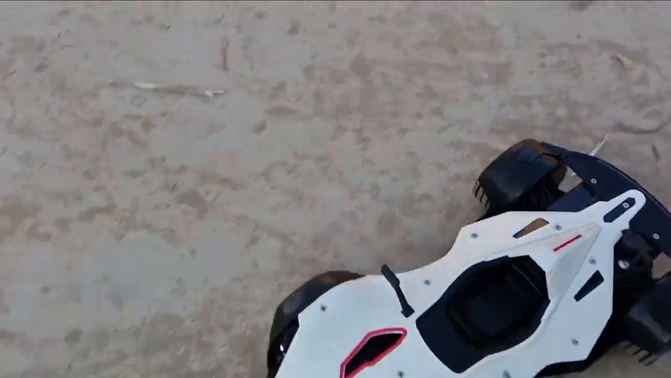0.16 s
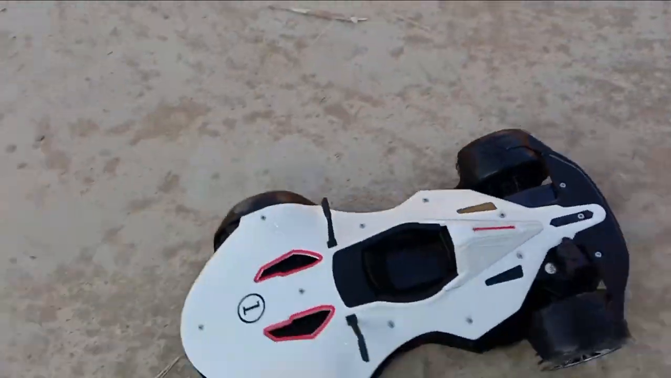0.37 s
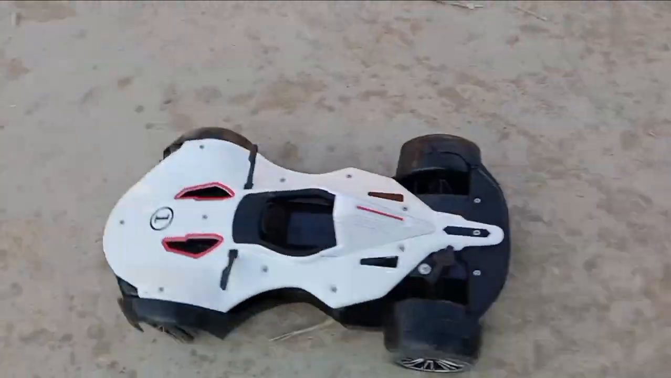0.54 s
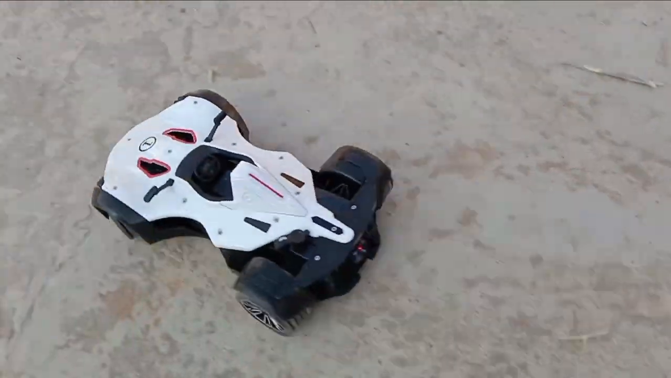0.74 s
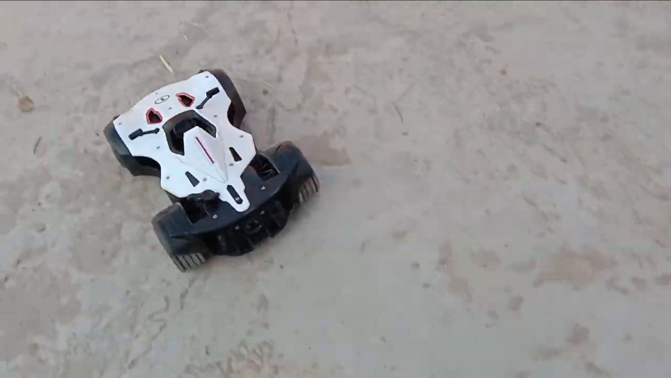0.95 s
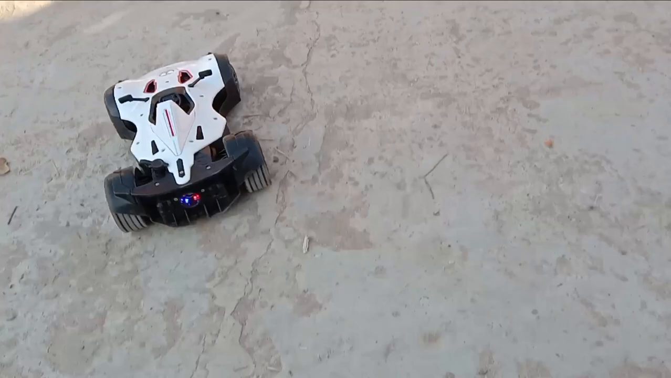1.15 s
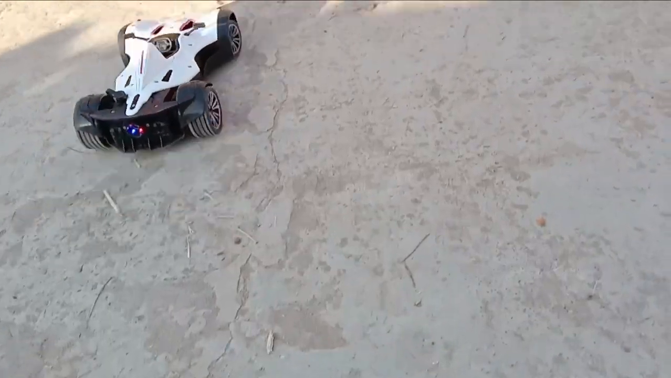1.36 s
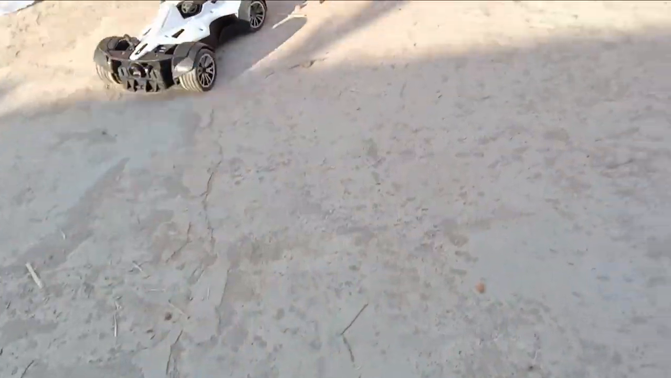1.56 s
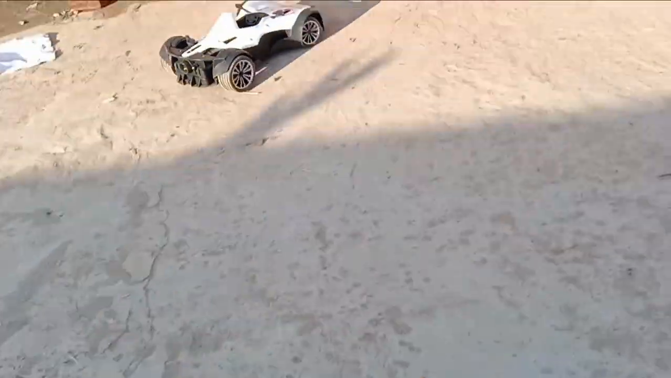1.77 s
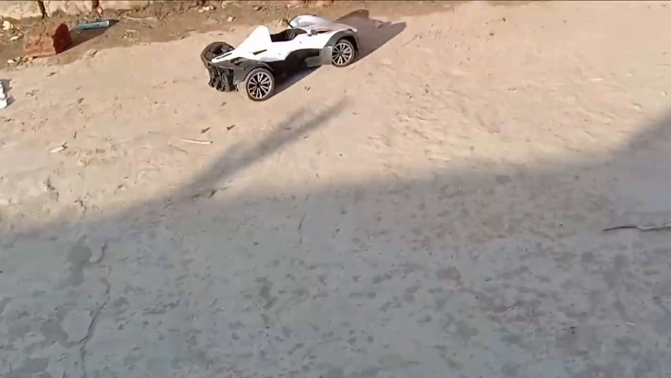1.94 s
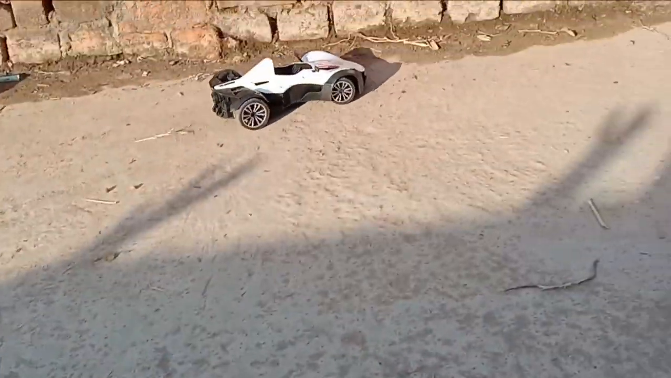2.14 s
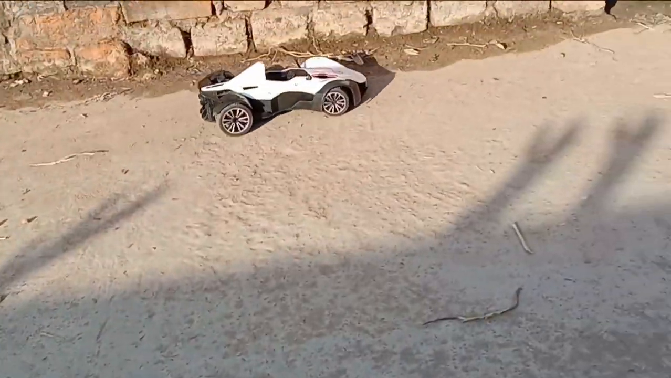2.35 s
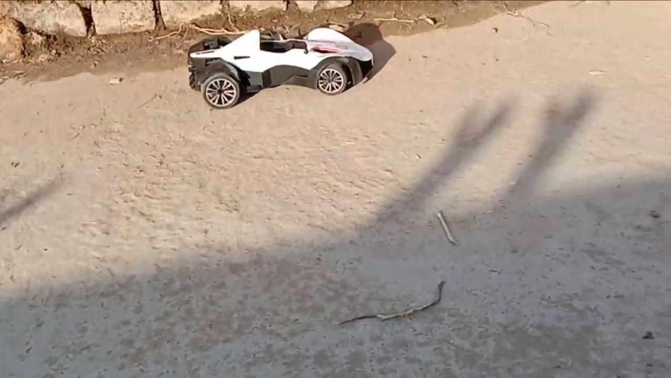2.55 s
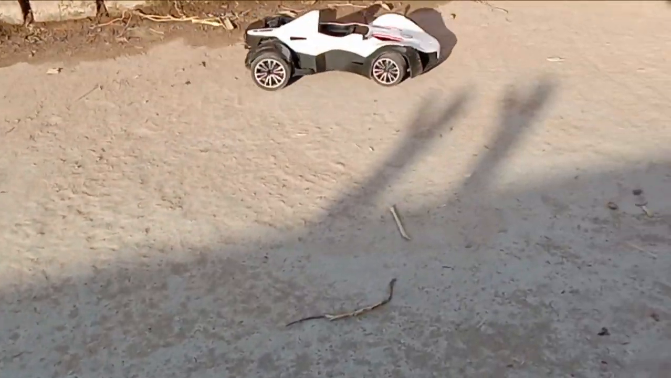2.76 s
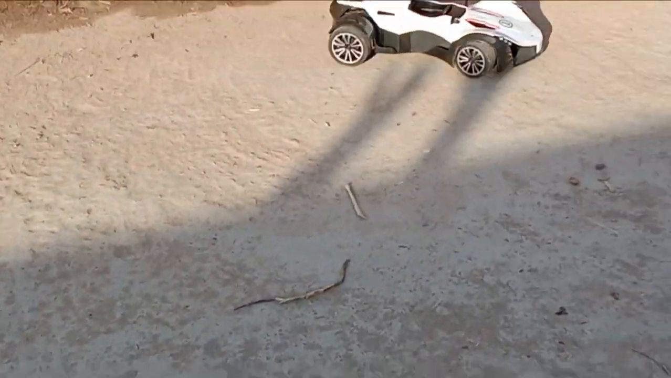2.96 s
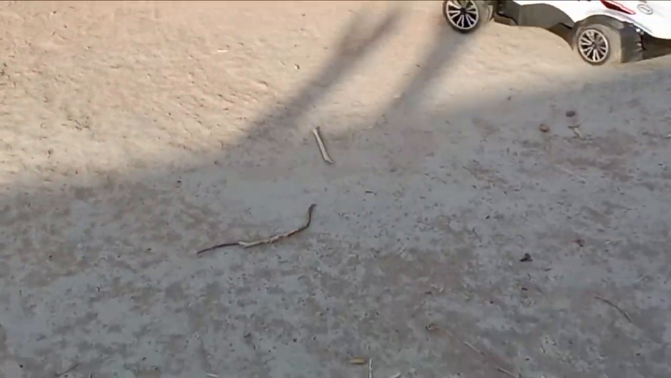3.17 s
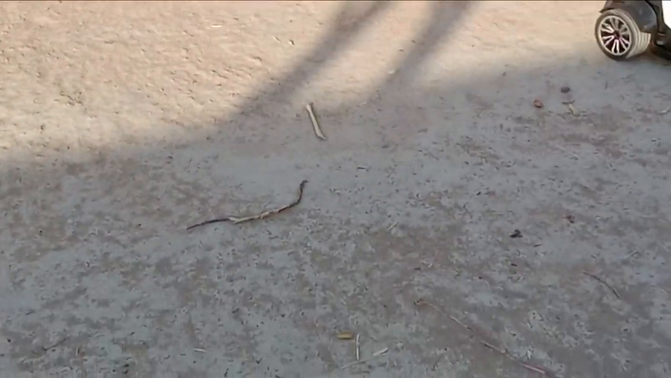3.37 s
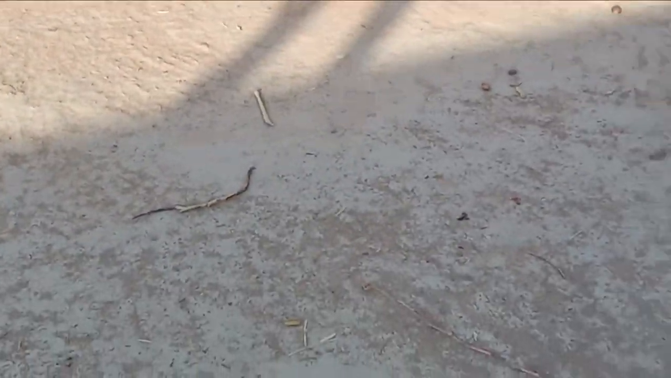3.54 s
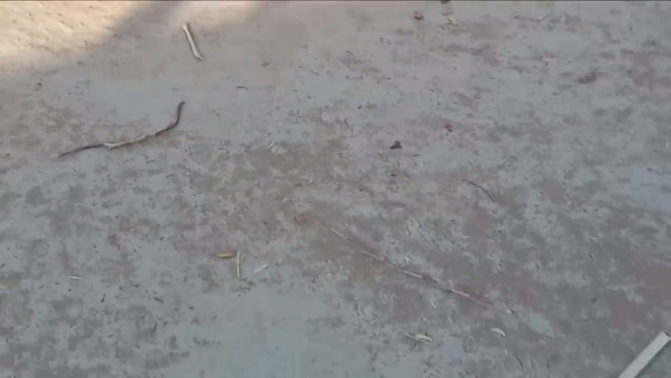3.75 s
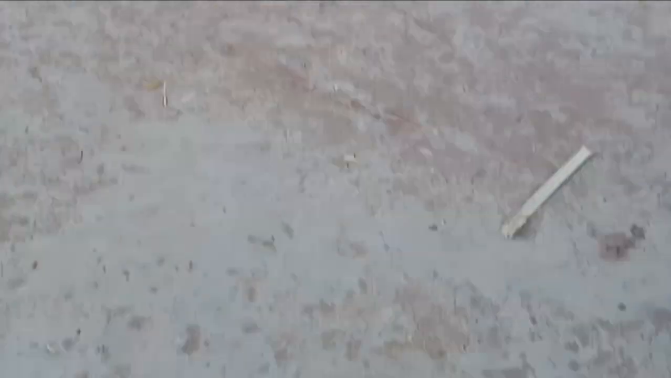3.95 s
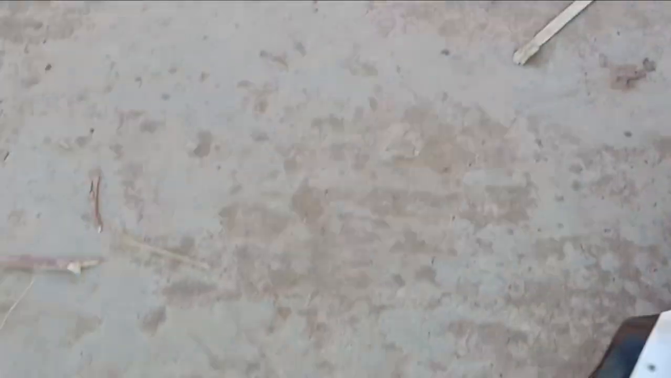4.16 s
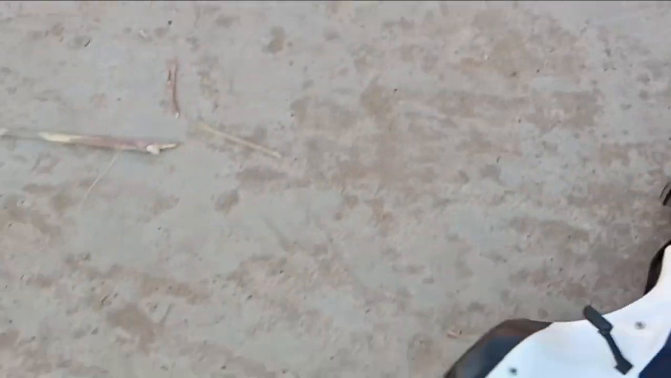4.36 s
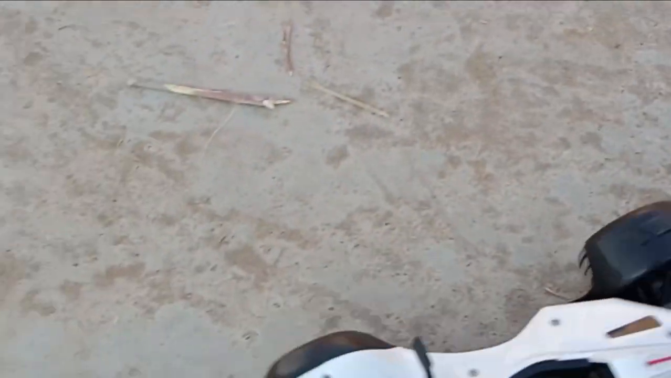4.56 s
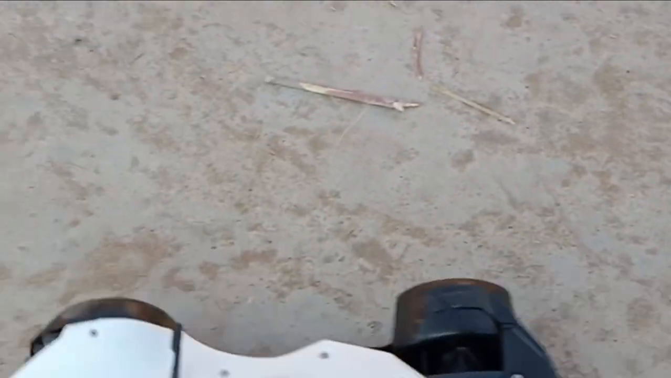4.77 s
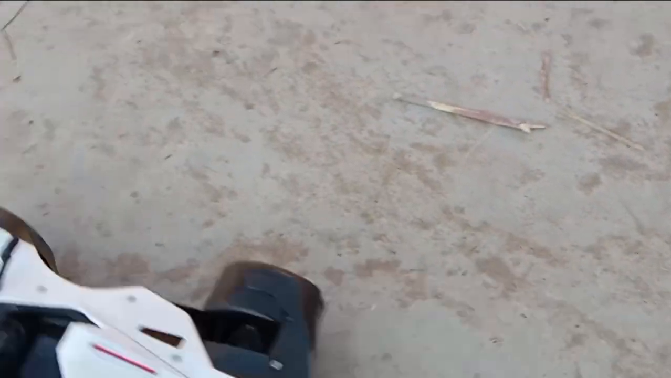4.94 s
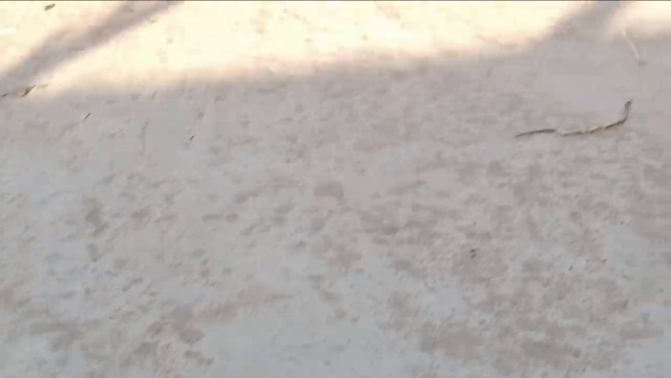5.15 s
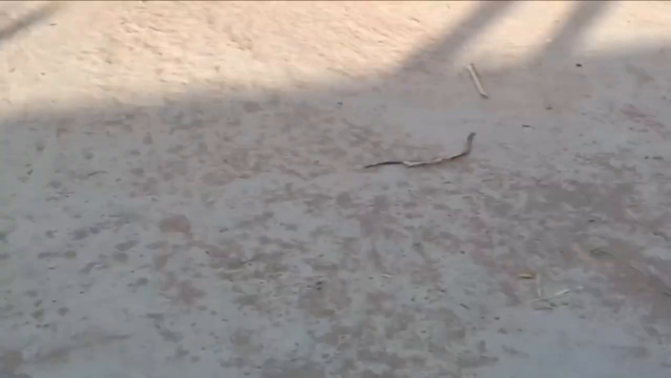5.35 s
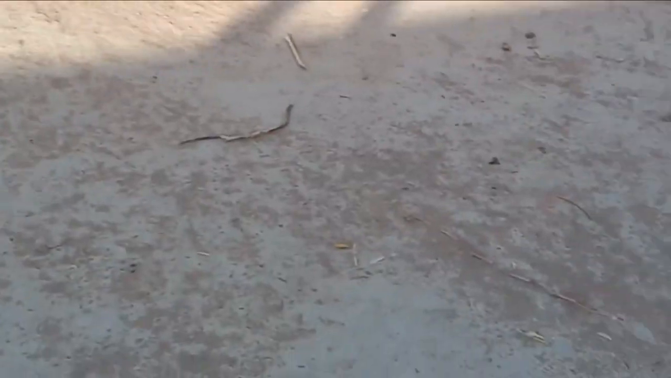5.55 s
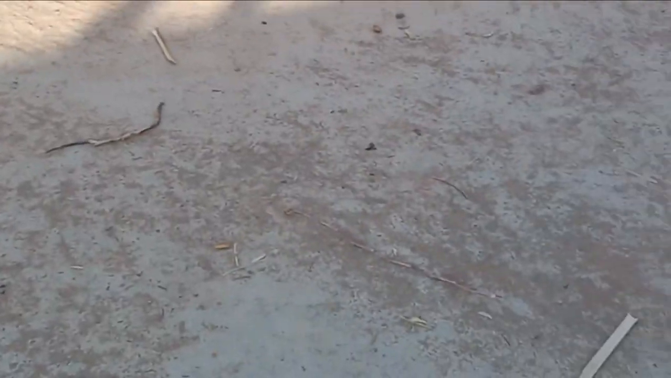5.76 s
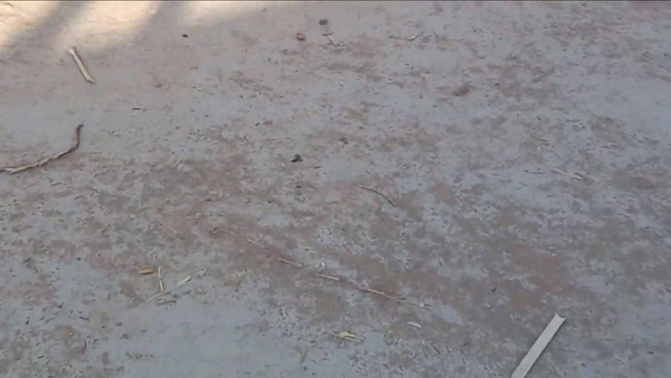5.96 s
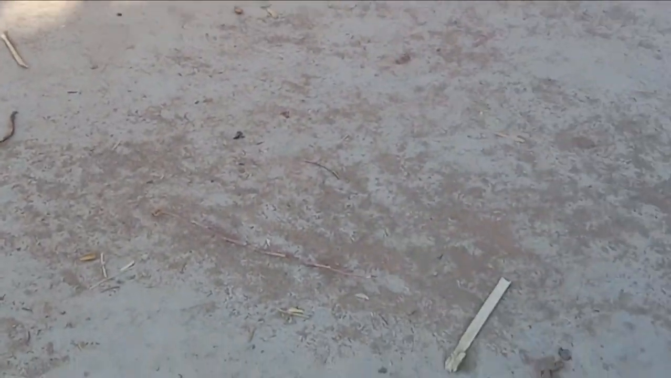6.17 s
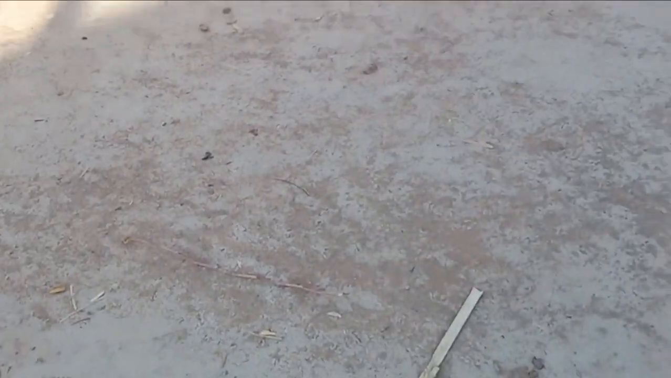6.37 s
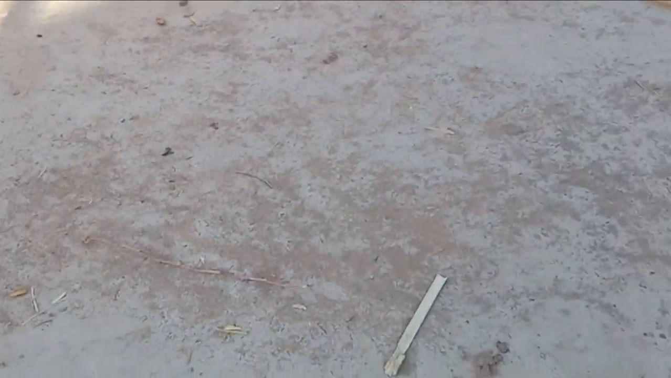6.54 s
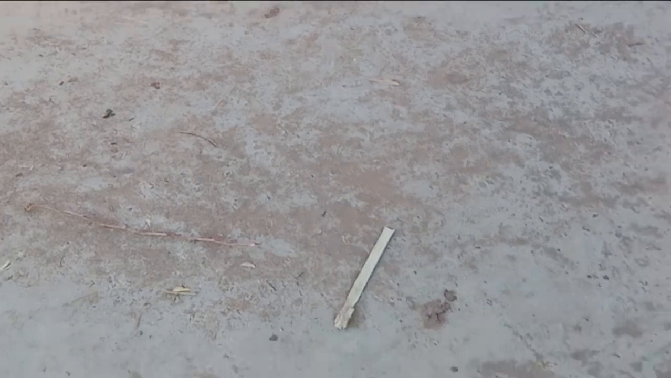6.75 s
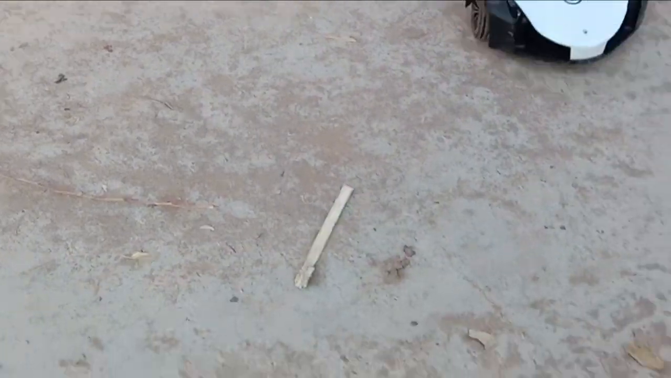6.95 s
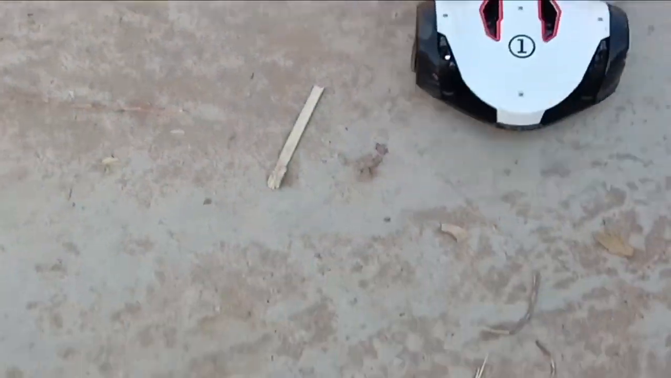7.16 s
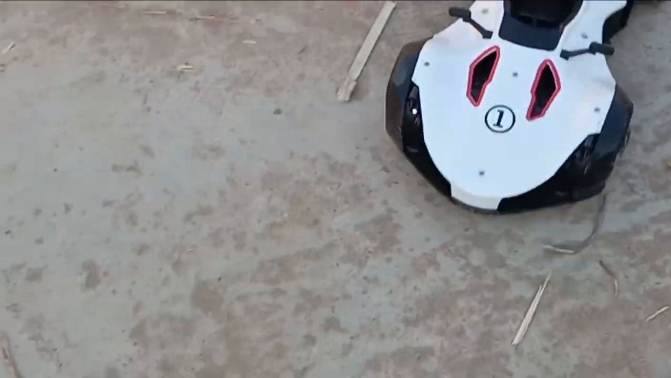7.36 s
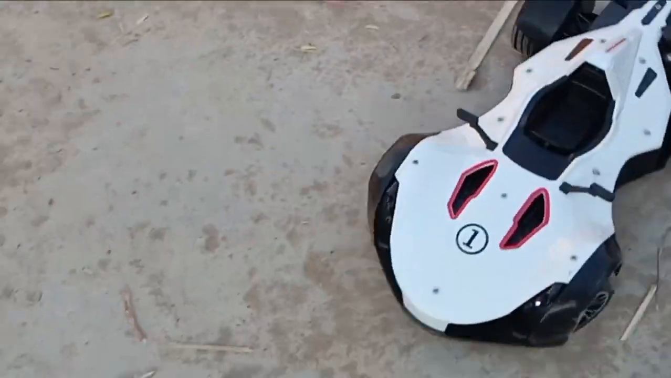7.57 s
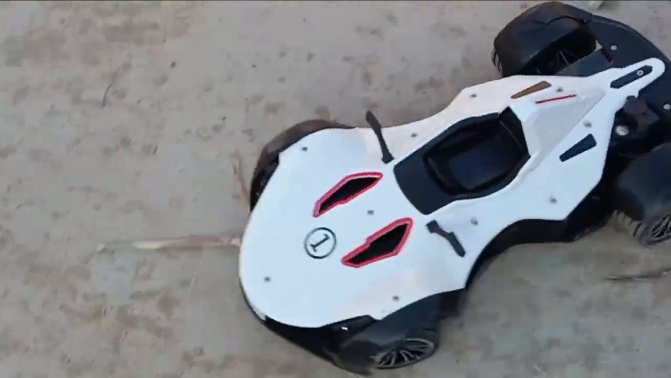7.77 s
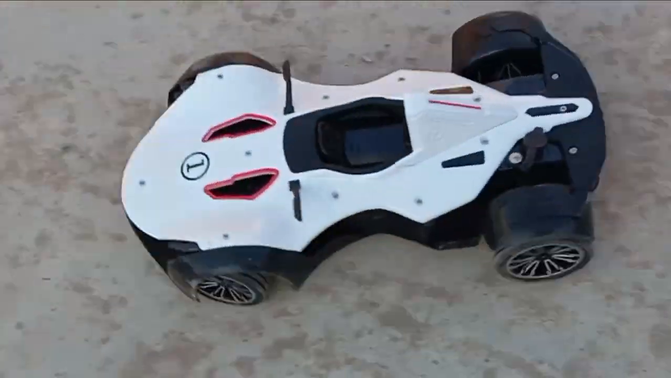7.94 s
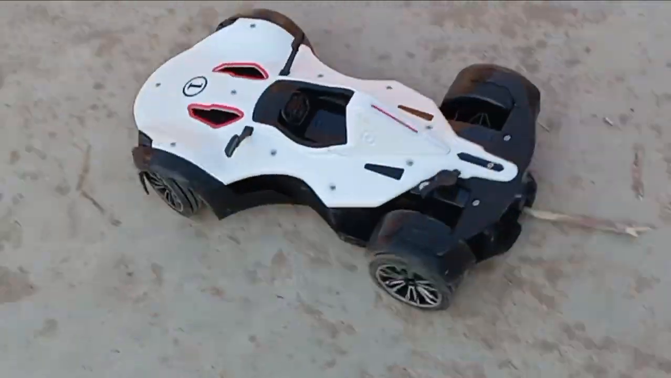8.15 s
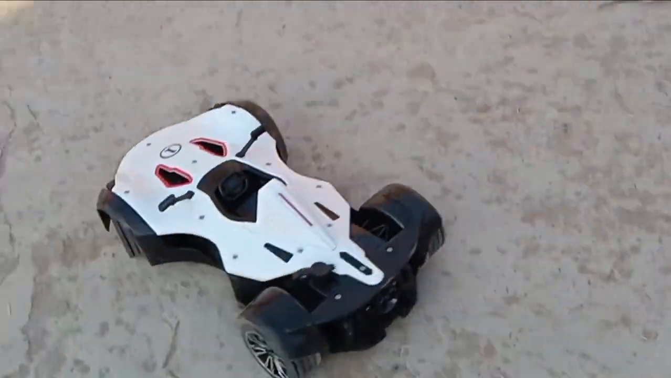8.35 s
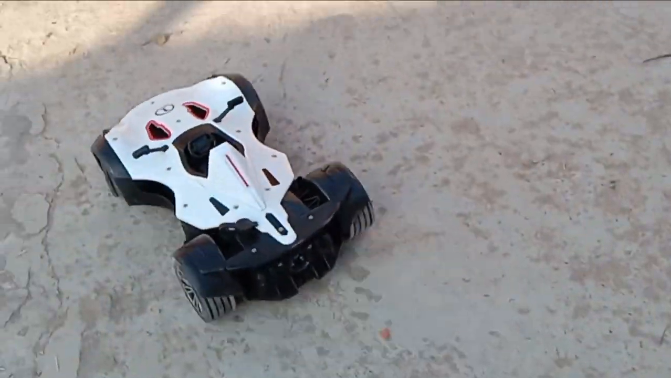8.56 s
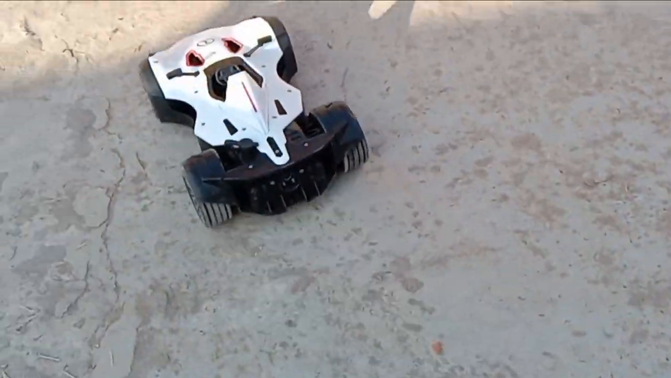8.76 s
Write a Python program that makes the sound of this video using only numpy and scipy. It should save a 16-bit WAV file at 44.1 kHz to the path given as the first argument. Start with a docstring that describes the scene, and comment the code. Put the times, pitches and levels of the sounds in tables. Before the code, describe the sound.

A small battery toy car runs close to a handheld microphone on rough concrete, in dry, quiet outdoor air. From 0 s gears whirr, wheels scrape and the hollow plastic shell rattles; a hard, short knock on the microphone lands near 0.7 s. Bumpy clacks continue, then the sound stutters and dies by about 1.7 s, leaving faint air and soft wind puffs. It creeps back from 2.2 s and is loud by 2.8 s, with scratchy ridge hits around 3.0-3.5 s, a rough skid at 3.9 s and a stone tick at 4.2 s. One falling bird whistle comes at 4.4 s over a faint hum. Strong clatter until 5.0 s drops to weak sputters. It builds again from 5.7 s, turns into smoother gear whirr around 6.9 s, squawks at 7.6 s, whirrs steadily from 7.8 s, and stops near 8.6 s with a tiny ring.

```python
"""Toy car on rough concrete

A small battery toy car drives in short bursts close to a phone: its rolling parts are filtered noise,
its rings, rattle and gear hum are sines. Bumps and grit under hard wheels shake the hollow plastic shell.
The gears whirr, loose parts rattle, wheels scratch on ridges and squawk in skids, and small stones tick.
The phone is knocked a few times (damped sines), a bird calls once and a faint hum sounds (gliding sines),
and wind and quiet outdoor air (soft noise) lie behind."""
import sys
import numpy as np
from scipy import signal
from scipy.io import wavfile
from scipy.ndimage import uniform_filter1d, map_coordinates

SR = 44100
rng = np.random.default_rng(int(sys.argv[2]) if len(sys.argv) > 2 else 0)


def persist_wave(psi):
    """Save psi, clipped to +-1, as 16-bit WAV."""
    counts = np.round(np.clip(psi, -1, 1) * 32767).astype(np.int16)
    wavfile.write(sys.argv[1], SR, np.atleast_2d(counts).T)


def rack_gain(trim_db):
    """Turn a fader trim in dB into the linear factor to multiply a signal by."""
    fader = np.asarray(trim_db, float)
    return 10 ** (fader / 20)


N = 388521  # length in samples
HOP = 256  # samples between short-time frames
HZ = np.fft.rfftfreq(1024, 1 / SR)[:, None]  # frequency of each short-time bin


def evened(x):
    """Scales to rms 1."""
    return x / np.sqrt(np.mean(x ** 2) + 1e-20)


def steady(x):
    """Divides out the slow level, so that only the fast grain is left."""
    slow_power = uniform_filter1d(uniform_filter1d(x ** 2, 6000), 6000)
    return x / np.sqrt(slow_power + 1e-20)


def spectra(x):
    """Short-time spectra, bins by frames."""
    return signal.stft(x, nperseg=1024, noverlap=1024 - HOP)[2]


def sound(z):
    """Back from short-time spectra to a waveform."""
    return signal.istft(z, nperseg=1024, noverlap=1024 - HOP)[1][:N]


def read(points, hz):
    """Spectrum in dB at hz, read along a log frequency scale; -90 dB outside its ends."""
    f, value = np.transpose(points)
    return np.interp(np.log(hz + 1), np.log(f + 1), value, -90, -90)


def follow(rows, t, column=1):
    """One column of a table, read as a curve at times t."""
    columns = np.transpose(rows)
    return np.interp(t, columns[0], columns[column])


def add(mix, s, part):
    """Mixes a part in at time s."""
    place = mix[round(s * SR):][:len(part)]
    place += part[:len(place)]


def swells(rows):
    """Level curve of smooth swells; each row: middle in seconds, level in dB, half length in seconds."""
    t = np.arange(N) / SR
    return sum(rack_gain(db) * np.exp(-((t - s) / half) ** 2) for s, db, half in rows)


def tone(rows):
    """A sine that follows pitch and level; silent before and after its rows."""
    s, hz, db = np.transpose(rows)
    t = np.arange(N) / SR
    level = np.sqrt(2) * rack_gain(np.interp(t, s, db, -200, -200))
    turns = np.cumsum(np.interp(t, s, hz)) / SR
    return level * np.sin(2 * np.pi * turns)


def colour(x, points):
    """Filters through a spectrum with a causal (minimum-phase) filter."""
    db = read(points, np.fft.rfftfreq(4096, 1 / SR))
    log_gain = np.log(rack_gain(np.r_[db, db[-2:0:-1]]))
    phase = -signal.hilbert(log_gain).imag
    taps = np.fft.ifft(np.exp(log_gain + 1j * phase)).real
    return signal.oaconvolve(x, taps[:2048])[:N]


def patchy(x, tint_db, patch_db, size=(3, 26)):
    """Filters by a tint; patches of the spectrum (size in bins by frames) swell and sink on their own."""
    z = spectra(x)
    field = rng.standard_normal(z.shape[::-1]).T
    field = uniform_filter1d(field, size=size[0], axis=0)
    field = evened(uniform_filter1d(field, size=size[1], axis=1))
    return sound(z * rack_gain(tint_db + patch_db * field))


def bumps(per_s, spread_db, fade_s):
    """Envelope of random bumps in the ground: sudden rise, exponential fall."""
    where, size = rng.random(N), np.minimum(rng.exponential(1, N), 4)
    kicks = (where < per_s / SR) * rack_gain(spread_db * size)
    return evened(signal.lfilter([1], [1, -np.exp(-1 / (fade_s * SR))], kicks))


# Colour of the outdoor air. Each row: frequency in Hz, strength in dB per Hz.
YARD_COLOUR = [(24, -33), (40, -6.5), (364, -12.5), (412, -14), (478, -19.5), (1460, -1.5), (1730, -46.5),
               (5290, -23), (7310, -49), (15000, -59.5)]


def yard():
    """Quiet outdoor air: noise in a fixed colour with slight patches."""
    level_db = -60.5
    return rack_gain(level_db) * evened(patchy(rng.standard_normal(N), read(YARD_COLOUR, HZ), 0.9))


# Puffs of wind. Each row: middle in seconds, level in dB, half length in seconds.
GUSTS = [(0.506, -55.5, 0.25), (1.213, -49.5, 0.044), (1.355, -57, 0.063), (2.935, -57.5, 0.18),
         (5.05, -56, 0.027)]


def wind():
    """Low lumps of air across the microphone port: swelling low noise."""
    low_colour = [(40, -29.5), (70, 0.0), (130, 10.0), (300, -14.0), (500, -30.5)]  # Hz, dB per Hz
    return swells(GUSTS) * evened(colour(rng.standard_normal(N), low_colour))


# A faint distant hum. Each row: time in seconds, pitch in Hz, level in dB.
HUM = [(3.5, 310, -70), (3.9, 310, -55), (4.0, 311, -52), (4.5, 313, -55), (4.85, 318, -57),
       (5.0, 320, -52), (5.08, 320, -70)]


def hum():
    """A sine that drifts slightly in pitch."""
    return tone(HUM)


# One falling bird call. Each row: time in seconds, pitch in Hz, level in dB.
BIRD = [(4.372, 8270, -76), (4.384, 7580, -38), (4.41, 6970, -34), (4.444, 6450, -28.5),
        (4.465, 6420, -31.5), (4.485, 6470, -54)]


def bird():
    """A whistled call: one short sine whose pitch slides down."""
    return tone(BIRD)


# Knocks on the phone, and one soft low puff of wind at 1.755 s.
# Each row: start in seconds, level in dB, pitch in Hz, time to fall by 60 dB in seconds.
KNOCKS = [(0.6645, 4, 665, 0.012), (0.665, 0, 230, 0.017), (0.677, -18, 156, 0.04),
          (.68, -24.5, 63.4, 0.11), (1.628, -28, 305, 0.033), (1.755, -34.5, 101, 0.15),
          (4.55, -22, 75.5, 0.082), (4.556, -29, 256, 0.033), (6.142, -28, 162, 0.029)]


def knocks():
    """Low damped swings of the phone case, and one soft low puff of wind, each a fading sine."""
    out, t = np.zeros(N), np.arange(SR // 2) / SR
    rise_cycles = 0.7
    for s, db, hz, t60 in KNOCKS:
        rise = np.minimum(t * hz / rise_cycles, 1) ** 2
        add(out, s, rack_gain(db - 60 * t / t60) * np.sin(2 * np.pi * hz * t) * rise)
    return out


# Dry ticks of small stones. Each row: start in seconds, level in dB.
TICKS = [(.252, -37), (2.4806, -27), (2.712, -33), (3.8146, -27), (4.2014, -19)]


def ticks():
    """A sub-millisecond snap of noise with almost no bass."""
    out, t = np.zeros(N), np.arange(400) / SR
    fade_s = 0.0007
    for s, db in TICKS:
        add(out, s, rack_gain(db) * rng.standard_normal(len(t)) * np.exp(-t / fade_s))
    return signal.sosfilt(signal.butter(3, 4500, "high", fs=SR, output="sos"), out)


# Wheels sliding sideways. Each row: middle in seconds, level in dB, half length in seconds.
SKIDS = [(3.87, -26, 0.085), (7.645, -22.5, 0.035), (8.492, -31, 0.018), (8.57, -31, 0.02)]
# Colour of their squawk. Each row: frequency in Hz, strength in dB per Hz.
SQUAWK = [(1350, 8), (1600, 6), (2080, 3.5), (2500, -9), (3000, -20), (4500, -11)]


def skids():
    """Brief swells of rough scrape: noise shaken by fast random bumps."""
    rough = rng.standard_normal(N) * (0.81 + bumps(260, 2.2, 0.0011))
    return swells(SKIDS) * evened(colour(rough, SQUAWK))


# A low gear hum. Each row: time in seconds, pitch in Hz, level in dB.
GEAR_HUM = [(7.0, 525, -62), (7.88, 512, -55), (8.16, 498, -54)]


def gear_hum():
    """A low sine from the gears, slowly sinking in pitch."""
    return tone(GEAR_HUM)


# Names of the sides of the car, in the order that other tables use.
SIDES = ["left", "tail", "far", "belly", "flank", "corner", "nose", "roof", "right"]
# Which side faces the phone. Each row: start in seconds, name of the side.
TURNS = [(0, "left"), (.62, "tail"), (2.1, "far"), (2.75, "belly"), (4.36, "flank"), (5.07, "corner"),
         (5.62, "nose"), (6.7, "roof"), (7.72, "right")]


def facing(t):
    """Share of each side that faces the phone, sides by times; a turn takes a moment."""
    starts = [s for s, name in TURNS]
    order = np.array([SIDES.index(name) for s, name in TURNS])
    side = order[np.searchsorted(starts, t, "right") - 1]
    turn = max(round(0.05 / (t[1] - t[0])), 1)  # 0.05 s, counted in steps of t
    chosen = 1. * (side == np.arange(len(SIDES))[:, None])
    return uniform_filter1d(chosen, size=turn, axis=1)


# Resonances and dips of the shell. Each row: frequency in Hz, then the height in dB for each of SIDES.
PLATES = [(355, 3, -1.5, -11, -0.5, 3, 7.5, -9, -7, 5.5), (510, 1.5, 4.5, 4.5, 6, 4.5, 4, 5, 10.5, 11),
          (682, 1.5, -8, -3, -1.5, -0.5, -11, -13, 5.5, -1.5),
          (814, 9.5, -3, 13, 4.5, -1, -13, 12, 7.5, -12), (985, 3, 6, -6, 8, 0.5, 7, 13, 3.5, -2.5),
          (1110, 7.5, -2.5, 4, -1.5, -12, -10, 9, 6.5, 3), (1251, 7, 8.5, 8.5, 1.5, -1, 10, 6, 1, 4.5),
          (1523, -2.5, 12, 17, 3.5, 3.5, -8, -10.5, -9, -9), (1772, 0, -2, -23, 3, -3, 3, -1, 0.5, 0),
          (1850, -4.5, -5.5, 18.5, 6, -2, -8, -8, -10, -3), (2040, -1.5, -14, -14, 7.5, 3, 13, 2, -16, -11),
          (2265, -18.5, -10, 9, 7, -0.5, -4, -3, -8, -8), (2718, 10.5, 1.5, 3, -7, 2.5, 5.5, 0.5, 0.5, 8.5),
          (3210, 9.5, 3.5, 13, -4, 3, -4, -9, 0.5, -13), (3720, 10.5, 7, 4, 3.5, 5.5, -6, 9.5, 6.5, 7.5),
          (4070, 10.5, 1, 1, 6, -1, -11, -6, -1, 3.5), (4424, 10, -1.5, -10, -1.5, 1, -21, 8, 2.5, -6),
          (5074, 12, 10.5, 4, -11, 1, -8, -16, -14, -13), (5703, 3.5, 8, 1, -8, 0, -3, 5.5, 3.5, 6.5),
          (6300, -26, -1.5, -18, -6, 2, 7, 3, 3, 3.5), (7440, -13.5, -9.5, -8, -8, -1, 13, 9, 3, 13),
          (9700, 13, 4.5, -2, -6.5, 2, 4, -7, 3, 7)]
# Overtones of the gear mesh that stand out on smooth ground. Each row: multiple of the mesh pitch, height in dB.
MESH_OVERTONES = [(5, 10.3), (6, 15), (7, 3.3)]
# Smoothness of the ground. Each row: time in seconds, smoothness from 0 to 1.
SMOOTH = [(6.72, 0), (6.85, 1), (7.1, 1), (7.2, 0), (7.7, 0), (7.8, 1), (8.45, 1), (8.55, 0)]
# The upper resonances slide as the angle to the phone changes. Each row: time in seconds, full shift in percent.
SLIDE = [(0, 6), (.6, -1), (.65, -2), (1.6, -2), (2.15, 5), (2.45, -1), (2.8, 1.5), (5.6, 1), (6.65, 1),
         (6.75, 1), (7.7, 0.5), (8.6, -1.5)]


def shell_db():
    """Resonances of the side that faces the phone, bins by frames in dB; higher ones are wider and slide."""
    half_width_hz, widening = 30, 0.018  # widening is in Hz per Hz
    mesh_hz, waver_percent, slide_from_hz = 1544, 1.9, 1500

    def peak(hz):
        return 1 / (1 + ((HZ - hz) / (half_width_hz + widening * hz)) ** 4)

    t = np.arange(-(-N // HOP) + 1) * HOP / SR
    sides = sum(peak(hz) * np.array(db) for hz, *db in PLATES)
    mesh = sum(db * peak(k * mesh_hz) for k, db in MESH_OVERTONES)
    still = sides @ facing(t) + mesh * follow(SMOOTH, t)
    waver = uniform_filter1d(rng.standard_normal(len(t)), size=12)
    waver = evened(uniform_filter1d(waver, size=12))
    # no shift below slide_from_hz, the full shift from twice that
    reach = np.clip(HZ / slide_from_hz - 1, 0, 1)
    shift = (follow(SLIDE, t) + waver_percent * waver) / 100 * reach
    bins, frames = np.indices(still.shape)
    return map_coordinates(still, [bins / (1 + shift), frames], order=1, mode="nearest")


# Wheels striking ridges. Each row: start in seconds, level in dB.
RIDGES = [(0.212, -24), (0.871, -27), (1.196, -23), (1.565, -26.5), (1.629, -32), (2.756, -22.5),
          (3.045, -21.5), (3.127, -21), (3.191, -19), (3.234, -17.5), (3.3184, -18.5), (3.439, -19),
          (3.5324, -14), (4.197, -21.5), (4.775, -15.5), (4.817, -23), (4.863, -22.5), (4.898, -22.5),
          (4.956, -14.5), (4.962, -27), (5.025, -18.5), (5.039, -27), (5.298, -34.5), (5.311, -36),
          (5.501, -33), (5.927, -28), (6.038, -26), (6.207, -27), (6.3128, -24), (6.397, -29), (6.515, -25),
          (6.608, -23.5), (6.72, -25), (6.789, -22.5), (7.343, -30), (7.67, -37), (8.107, -30)]
# Colours of wheel scrape, gear whirr and grit hiss. Each row: frequency in Hz, strength in dB per Hz.
SCRAPE_COLOUR = [(1350, -13), (1600, 10.5), (2400, 11.5), (3100, 6), (3500, -3.5)]
WHIRR_COLOUR = [(2900, -11), (3300, 4.5), (4500, 2), (6000, 4.5), (6800, -0.5), (7100, -11.5),
                (7900, -11.5), (8400, -40.5)]
HISS_COLOUR = [(7800, -30), (8300, -4), (9300, -18.5), (10300, -7), (11400, -13.5), (12600, -5),
               (13500, -9), (15200, -17), (15600, -48.5)]


def ridges(shell):
    """Short bursts of wide scratch through the shell, in the colours of scrape, whirr and hiss."""
    hits, t = np.zeros(N), np.arange(2000) / SR
    shape = np.minimum(t / 0.0025, 1) * np.exp(-t / 0.007)  # rise and fade in seconds
    for s, db in RIDGES:
        add(hits, s, rack_gain(db) * shape)
    noise = rng.standard_normal((3, N))
    scratch = 0.43 * evened(colour(noise[0], SCRAPE_COLOUR))
    scratch += 0.56 * evened(colour(noise[1], WHIRR_COLOUR))
    scratch += rack_gain(-25.5) * evened(colour(noise[2], HISS_COLOUR))
    return hits * steady(sound(spectra(scratch) * rack_gain(shell)))


# Short rings of the shell, loud and faint, and a last narrow ring as the car stops.
# Each row: start in seconds, level in dB, pitch in Hz, length in seconds.
RINGS = [(0.535, -18, 1186, 0.017), (0.55, -9.5, 990, 0.0053), (0.565, -17.5, 990, 0.031),
         (0.923, -20, 985, 0.012), (1.021, -21, 975, 0.012), (1.057, -18.5, 960, 0.015),
         (1.096, -16, 990, 0.017), (1.116, -16.5, 990, 0.013), (1.155, -18, 935, 0.019),
         (1.194, -12, 932, 0.015), (3.114, -13.5, 890, 0.0057), (3.159, -12, 1028, 0.018),
         (3.272, -11, 966, 0.012), (3.324, -13.5, 1012, 0.016), (3.436, -14, 977, 0.03),
         (3.658, -16.5, 990, 0.0087), (4.123, -17, 1003, 0.024), (4.157, -14.5, 990, 0.016),
         (4.194, -12.5, 988, 0.015), (4.276, -11.5, 970, 0.022), (4.302, -10, 1020, 0.0085),
         (4.718, -8.5, 1050, 0.0046), (4.775, -2.5, 870, 0.0013), (4.855, -12.5, 1260, 0.013),
         (4.864, -7.5, 700, 0.0037), (4.935, -16, 1190, 0.0052), (4.965, -11.5, 1013, 0.0088),
         (5.152, -23, 1277, 0.013), (5.604, -32.5, 996, 0.024), (5.932, -13.5, 1030, 0.0036),
         (6.204, -19, 996, 0.019), (6.567, -12, 990, 0.038), (6.789, -15, 1220, 0.0035),
         (6.821, -10.5, 806, 0.0016), (7.204, -27, 980, 0.012), (7.418, -14, 1014, 0.0087),
         (7.634, -10.5, 1110, 0.011), (8.108, -15, 1150, 0.0065), (8.277, -13, 1280, 0.0076),
         (8.443, -18.5, 1346, 0.01), (8.565, -15.5, 1380, 0.0063), (8.619, -34, 1305, 0.033)]
# Boom of the shell. Each row: time in seconds, level in dB, resonance of the air inside in Hz.
BOOM = [(0.0, -25, 1030), (0.07, -28, 966), (0.49, -25.5, 1090), (0.64, -30, 1010), (0.73, -29, 1016),
        (0.95, -31, 990), (0.99, -37, 990), (1.1, -33, 1005), (1.3, -25.5, 1004), (1.52, -29, 1105),
        (1.6, -32, 1030), (1.66, -41.5, 1110), (1.71, -52, 1080), (1.8, -50.5, 1100), (1.9, -60, 1215),
        (2.13, -63.5, 1210), (2.23, -43.5, 1110), (2.33, -34, 960), (2.4, -36, 970), (2.5, -38.5, 1040),
        (2.68, -40.5, 990), (2.79, -25, 976), (3.45, -22.5, 960), (3.6, -27.5, 920), (3.75, -23.5, 1200),
        (4.02, -22.5, 1105), (4.1, -31, 1210), (4.14, -22.5, 1145), (4.61, -22.5, 990), (4.78, -24.5, 1140),
        (5.03, -25, 1110), (5.1, -36, 1230), (5.22, -40, 1300), (5.25, -36, 1190), (5.4, -39.5, 1260),
        (5.46, -46, 1210), (5.51, -40.5, 1050), (5.57, -50, 1200), (5.62, -40.5, 1230), (5.85, -29, 1296),
        (6.6, -23.5, 990), (6.72, -24, 1200), (7.21, -25, 1105), (7.55, -22.5, 1074), (7.83, -25, 1230),
        (8.59, -28.5, 1420), (8.68, -50.5, 1330), (8.81, -54.5, 1300)]


def rings():
    """Each jolt swells quickly at its own pitch and dies; small chance ones ring at the chassis pitch."""
    jolts_per_s, jolt_db, jolt_s, chassis_hz = 26, -11, 0.012, 990
    out, t = np.zeros(N), np.arange(3000) / SR

    def shape(length):
        rise = (1 - np.exp(-t / (0.1 * length))) ** 2
        return rise * np.exp(-(t / length) ** 2)

    for s, db, hz, length in RINGS:
        add(out, s, rack_gain(db) * shape(length) * np.sin(2 * np.pi * (hz * t + rng.random())))
    where, size = rng.random((2, N))
    # the size of the small jolts follows the boom
    small = (where < jolts_per_s / SR) * size * rack_gain(jolt_db + follow(BOOM, np.arange(N) / SR))
    out += signal.oaconvolve(small, shape(jolt_s) * np.sin(2 * np.pi * chassis_hz * t))[:N]
    return signal.sosfilt(signal.butter(3, 450, "high", fs=SR, output="sos"), out)


# Loose parts of the car: the pitch in Hz of each small mode.
LOOSE_HZ = [2224, 2596, 3270, 3810, 4380, 5030, 5685]
# Gear whirr. Each row: time in seconds, level in dB.
GEARS = [(0.0, -39.5), (0.03, -43.5), (0.54, -33), (0.64, -44), (1.1, -41.5), (1.28, -33), (1.4, -42),
         (1.5, -39.5), (1.7, -53.5), (2.1, -72.5), (2.3, -49), (2.66, -43.5), (2.8, -32.5), (3.39, -31),
         (3.62, -37.5), (4.11, -44.5), (4.17, -37), (5.03, -33.5), (5.08, -49), (5.18, -49), (5.27, -60),
         (5.33, -51.5), (5.4, -64.5), (5.6, -60.5), (5.77, -43.5), (5.95, -38.5), (6.12, -45), (6.7, -36.5),
         (7.02, -30), (7.21, -43.5), (7.6, -37.5), (7.72, -37), (7.97, -31.5), (8.44, -39), (8.6, -57),
         (8.72, -82), (8.81, -71)]


def rattle(shell):
    """Dense ticks of uneven size, each in one loose part, heard through the shell; quiet on smooth ground."""
    ticks_per_s, t60_s, rattle_db = 450, 0.011, -3  # rattle_db is relative to the whirr
    s, t = np.arange(N) / SR, np.arange(1200) / SR
    where, part = rng.random(N), rng.integers(0, len(LOOSE_HZ), N)
    size = np.minimum(rng.exponential(1, N), 4)
    hits = (where < ticks_per_s / SR) * rack_gain(3 * size)
    fade = np.minimum(t / 0.0008, 1) * rack_gain(-60 * t / t60_s)
    out = np.zeros(N)
    for k, hz in enumerate(LOOSE_HZ):
        out += signal.oaconvolve(hits * (part == k), fade * np.sin(2 * np.pi * hz * t))[:N]
    level = rack_gain(rattle_db + follow(GEARS, s)) * (1 - follow(SMOOTH, s))
    return level * steady(sound(spectra(out) * rack_gain(shell)))


# Wheel rumble. Each row: time in seconds, level in dB.
ROLL = [(0.0, -83), (0.05, -51.5), (0.64, -44), (0.66, -31), (0.73, -47.5), (1.59, -39.5), (1.84, -75),
        (3.04, -38.5), (3.95, -32.5), (4.09, -49), (4.32, -38.5), (5.03, -32), (5.19, -50.5), (5.28, -65.5),
        (6.6, -45.5), (6.77, -56), (6.82, -34), (6.92, -61), (7.05, -55.5), (7.46, -31), (7.7, -40),
        (8.14, -47), (8.18, -52.5), (8.81, -75)]
# Colour of the rumble. Each row: frequency in Hz, strength in dB per Hz.
RUMBLE_COLOUR = [(150, -34.5), (280, -22), (380, -15.5), (500, -8.5), (680, -0.5), (850, -31.5)]
# Wheel scrape. Each row: time in seconds, level in dB.
WHEELS = [(0.0, -40), (0.54, -28), (0.64, -39.5), (1.1, -43.5), (1.28, -30.5), (1.54, -38), (1.7, -54.5),
          (1.9, -65.5), (2.15, -63.5), (2.33, -47.5), (2.68, -40.5), (2.78, -32.5), (2.94, -31.5),
          (3.73, -32.5), (3.85, -32.5), (4.07, -41.5), (4.51, -28.5), (4.93, -38), (4.95, -27.5),
          (5.1, -49), (5.27, -56), (5.48, -56), (5.52, -50), (5.6, -61), (5.69, -54), (5.84, -48.5),
          (7.07, -41), (7.19, -52.5), (7.45, -38.5), (7.63, -29), (7.75, -35.5), (8.0, -32), (8.04, -41.5),
          (8.52, -46), (8.71, -69), (8.81, -73)]
# Grit hiss for each of SIDES, in dB, when the whirr is at -40 dB.
HISS_DB = [-62, -64, -64, -63, -59.5, -52.5, -59.5, -61.5, -60.5]
# The rolling falters for a moment. Each row: middle in seconds, change of level in dB.
STALLS = [(0.647, -8), (1.619, -14), (1.679, -13), (1.731, -19), (5.289, -21), (5.482, -9), (5.592, -10),
          (3.179, -6), (4.76, -2), (4.99, -6.5), (5.008, -7.5)]


def car(shell):
    """One rough ground shakes every rolling part; each answers with noise in its own colour."""
    s, t = np.arange(N) / SR, np.arange(shell.shape[1]) * HOP / SR
    whirr_db = follow(GEARS, s)
    # the hiss follows the whirr, 1.34 dB for each dB
    hiss_db = HISS_DB @ facing(s) + 1.34 * (whirr_db + 40)
    ground = bumps(40, 1.6, 0.019)
    grit = bumps(550, 3.2, 0.0012)
    noise = rng.standard_normal((5, N))

    # the contact keeps changing, so every layer is patchy
    # the air inside the shell: a wide steep-sided band that moves as the car turns
    air_db = -np.minimum(6 * ((HZ - follow(BOOM, t, column=2)) / 300) ** 2, 90)
    boom = patchy(noise[0] * (4.6 + ground) * (4.4 + grit), air_db + shell, 3.64)
    rumble = patchy(noise[1] * (1.6 + ground), read(RUMBLE_COLOUR, HZ) + shell, 5.5)
    scrape = patchy(noise[2] * (2.4 + ground) * (1.4 + grit), read(SCRAPE_COLOUR, HZ) + shell, 4.6)

    # on smooth stretches the even mesh of the gears hides the bumps
    smooth = follow(SMOOTH, s)

    def meshed(bumpy):
        return (1 - smooth) * bumpy + smooth * bumpy.mean()

    gears, teeth = meshed(ground), meshed(grit)
    spits = meshed(ground + 0.41 * bumps(36, 3.5, 0.0031))
    whirr = patchy(noise[3] * (3 + gears) * (0.8 + teeth), read(WHIRR_COLOUR, HZ) + shell, 3.5)
    hiss = patchy(noise[4] * (0.7 + spits) * (2.9 + teeth), read(HISS_COLOUR, HZ) + shell, 4, size=(70, 6))

    out = rack_gain(follow(BOOM, s)) * steady(boom)
    out += rack_gain(follow(ROLL, s)) * steady(rumble)
    out += rack_gain(follow(WHEELS, s)) * steady(scrape)
    out += rack_gain(whirr_db) * steady(whirr)
    out += rack_gain(hiss_db) * steady(hiss)
    stall_s = 0.0077  # half length of a stall
    stall_db = sum(db * np.exp(-((t - at) / stall_s) ** 2) for at, db in STALLS)
    return rack_gain(np.interp(s, t, stall_db)) * out


def scene():
    """All sources, one microphone."""
    shell = shell_db()
    background = yard() + wind() + hum() + bird()
    touches = knocks() + ticks() + skids() + ridges(shell) + rings()
    driving = gear_hum() + rattle(shell) + car(shell)
    return (background + touches + driving)[None]


def low_pass(x):
    """Removes everything above the highest recorded frequency."""
    return signal.sosfilt(signal.butter(12, 16530, fs=SR, output="sos"), x)


def record(dry):
    """Noise suppression lowers what sinks under the mean of its band nearby in time; then the pass band."""
    z = spectra(dry[0])
    power = uniform_filter1d(abs(z) ** 2, size=3, axis=0)
    power = uniform_filter1d(power, size=5, axis=1) + 1e-20
    usual = np.exp(uniform_filter1d(np.log(power), size=60, axis=1))
    keep = np.maximum(power / (power + 0.18 * usual), rack_gain(-7))  # suppresses by 7 dB at most
    pass_band = [(20, -37.5), (65, 1.5), (16400, -3.5), (16600, -81)]  # microphone: Hz, dB
    keep *= rack_gain(read(pass_band, HZ))
    return low_pass(sound(z * keep)[None])


dry = scene()
out = record(dry)
persist_wave(out)
```